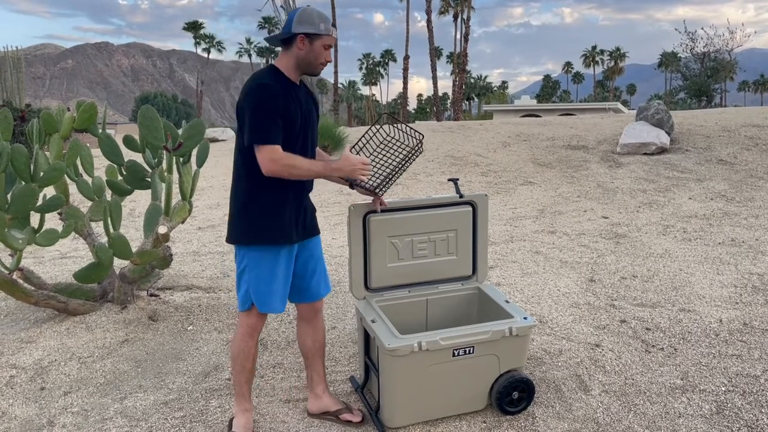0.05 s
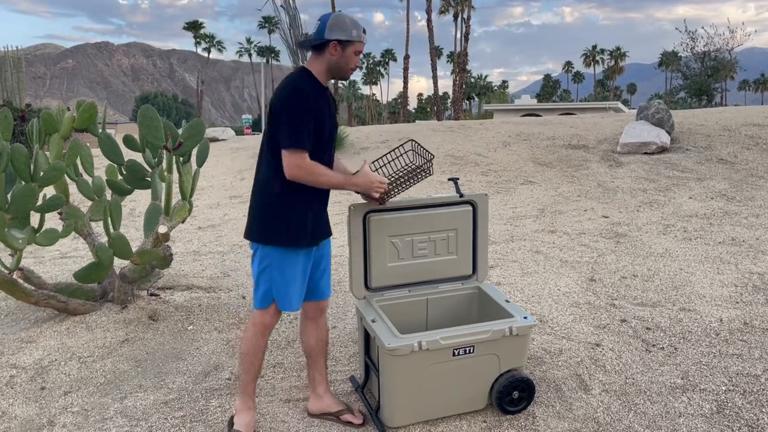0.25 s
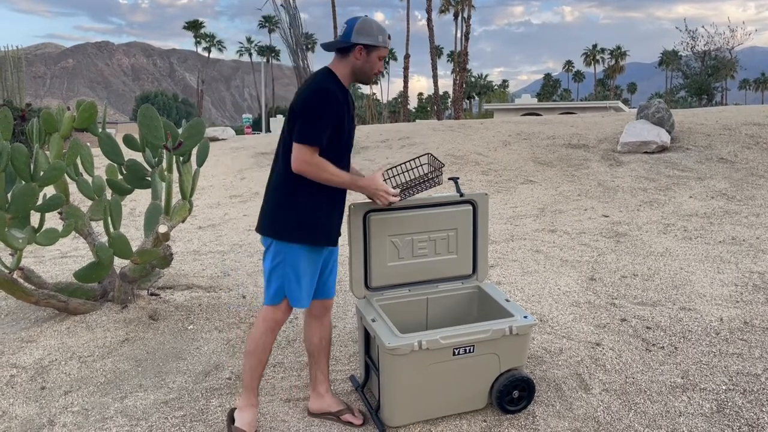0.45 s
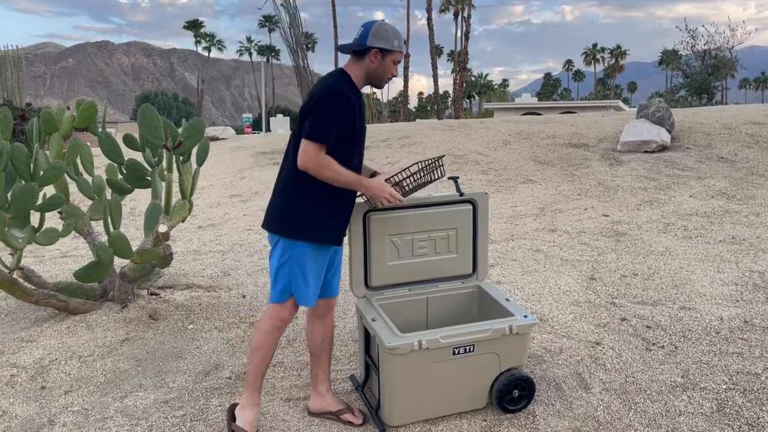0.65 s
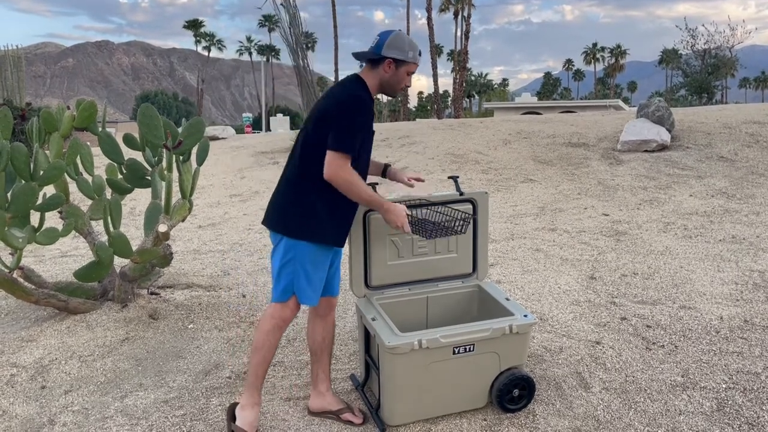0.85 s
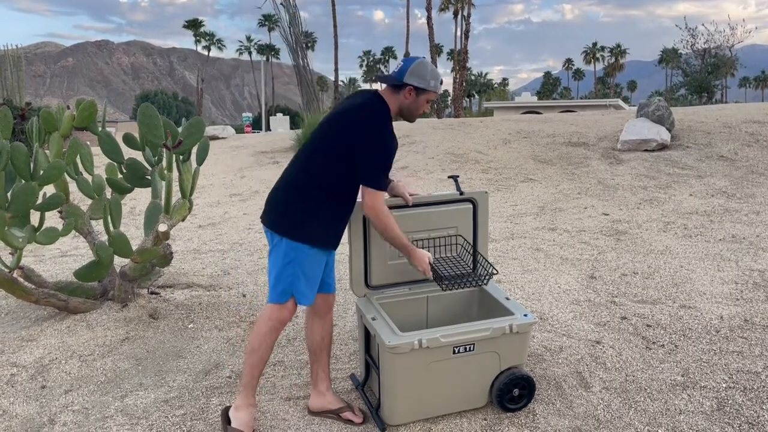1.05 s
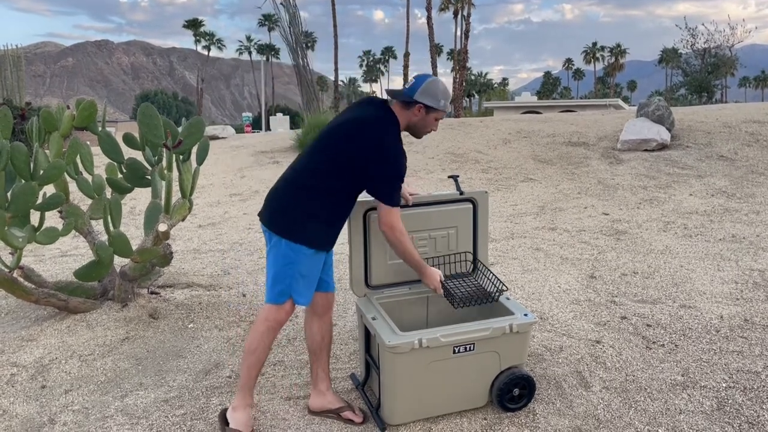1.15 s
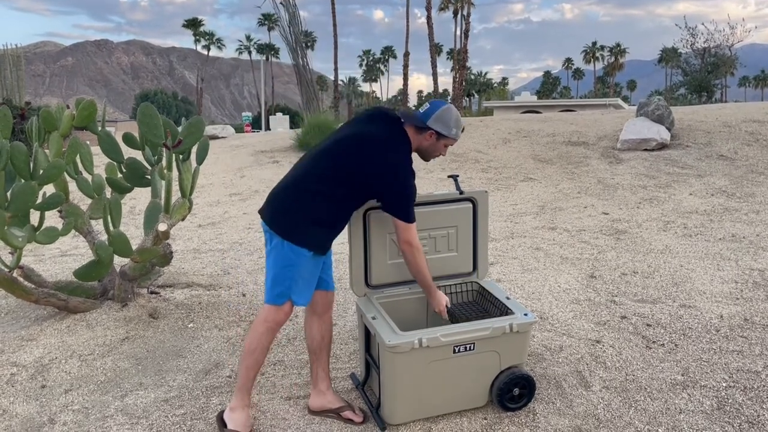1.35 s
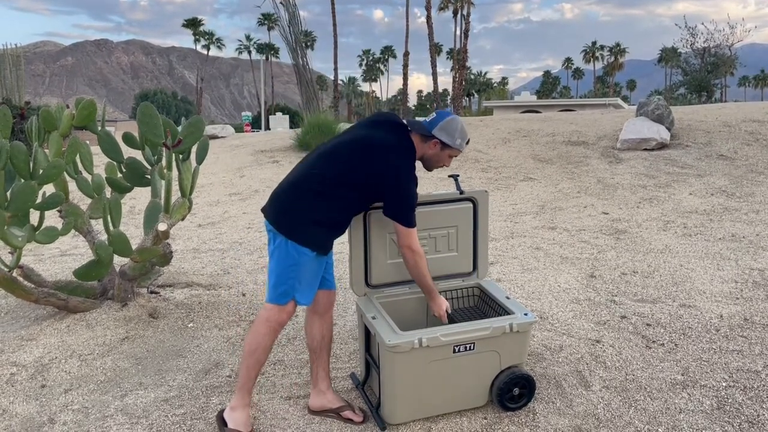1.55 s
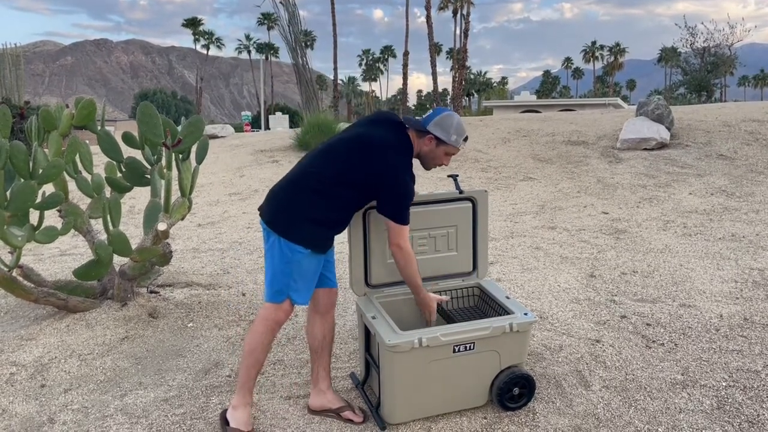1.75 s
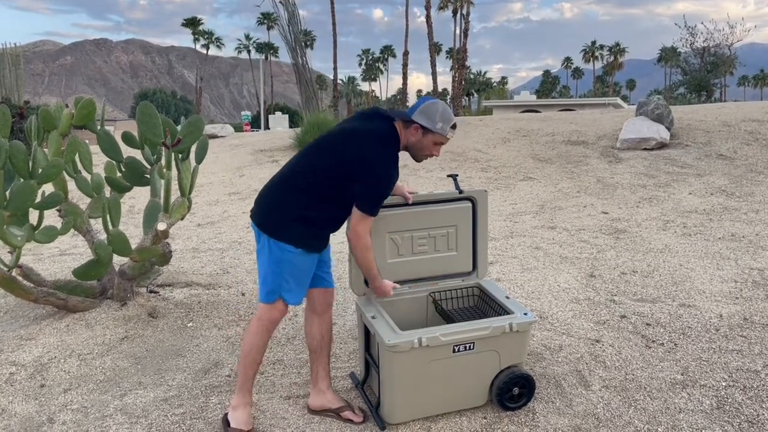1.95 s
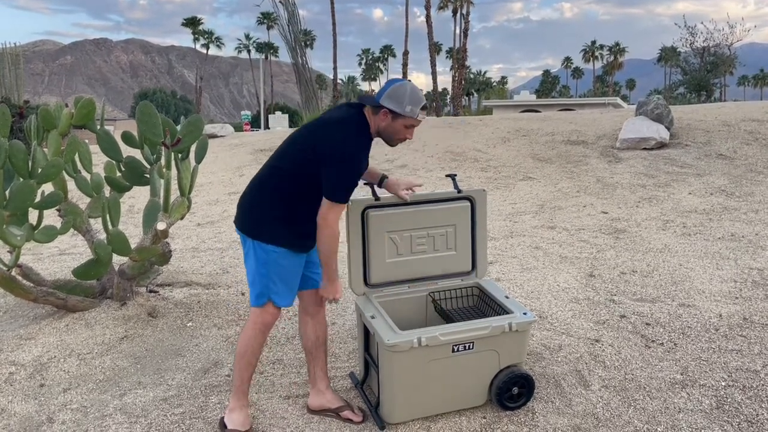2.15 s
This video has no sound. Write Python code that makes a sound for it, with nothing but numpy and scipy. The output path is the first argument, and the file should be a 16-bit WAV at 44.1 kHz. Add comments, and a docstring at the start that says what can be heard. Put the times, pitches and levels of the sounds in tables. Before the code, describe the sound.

Soft footfalls and grit crackle on sandy ground, then a wire basket knocks and scrapes quickly into a hollow plastic cooler, followed by tiny taps; outdoors, miked fairly close, low far-off rumble.

```python
"""You hear a wire basket catch the rim of an open plastic cooler, rattle down and seat in one short clunk.
Each touch makes a click, a dull clack and a short ring of the wires; sliding wires add a run of tiny ticks.
Heavier blows make the hollow cooler thump, with a weak echo. Before and after come light taps of the basket.
Sandals crack grit, scuff sand and make two soft footfalls, over a far rumble and rush like traffic outdoors.
Rings are fading sine waves; clicks, clacks, grit, scuffs and the background are shaped noise."""
import sys
import numpy as np
from scipy import signal
from scipy.fft import rfft, irfft, next_fast_len
from scipy.io import wavfile
from scipy.ndimage import map_coordinates

SR = 44100
rng = np.random.default_rng(int(sys.argv[2]) if len(sys.argv) > 2 else 0)


def master(y):
    """Save y as 16-bit WAV."""
    cut = np.clip(np.atleast_2d(y).T, -1, 1)
    pcm = np.round(cut * 32767)  # scale
    wavfile.write(sys.argv[1], SR, pcm.astype(np.int16))


N = 96623  # length in samples

# All levels in the tables are relative.
# Wire striking plastic. Each row: start in seconds, ring level in dB, click level in dB, favoured ring in Hz.
CONTACTS = [(1.3381, -20, -37, 1210), (1.3643, -20, -35.5, 1950), (1.379, -14.5, -38.5, 1700),
            (1.3826, -9.5, -25, 2760), (1.390, -19.5, -35.5, 1970), (1.4046, -16.5, -33.5, 1380),
            (1.412, -12, -36.5, 1204), (1.425, -15, -33, 1840), (1.449, -19, -33.5, 2200),
            (1.455, -9, -25.5, 1693), (1.4593, -24.5, -16.5, 1950), (1.463, -9.5, -39.5, 1210),
            (1.4868, -18.5, -24.5, 1865), (1.492, -11, -28, 1300), (1.498, -17, -20.5, 2400),
            (1.504, -13, -34.5, 1430), (1.519, -12.5, -21.5, 1800), (1.522, -13.5, -33, 1200),
            (1.53, -44.5, -54, 1520), (1.538, -23, -54, 1210)]
# Light taps of the basket in the hand and as it is let go. Each row: the same columns as CONTACTS.
TAPS = [(0.1253, -33, -62, 1770), (0.1289, -37, -56, 1820), (0.146, -36.5, -58, 1840),
        (0.9975, -36.5, -58.5, 2110), (1.7355, -42, -69, 2110), (1.738, -35.5, -78, 1380),
        (1.752, -40, -74, 1450), (1.762, -37.5, -73.5, 1060)]
CONTACT_OCTAVES, TAP_OCTAVES = 0.6, 0.24  # spread of a touch over the basket's tones
# The basket's own tones (modes). Each row: pitch in Hz, level in dB, time to fall 60 dB in seconds.
BASKET_MODES = [(1055, -2, .11), (1130, -3, .1), (1193, -2, .1), (1232, -1, .1), (1344, -2, .12),
                (1523, 0, .09), (1609, 1, .11), (1661, 0, .09), (1760, -1, .09), (1960, -7, .08),
                (2024, -7, .08), (2471, -4, .09), (2597, 0, .115), (2719, -2, .1), (2835, -3, .08)]
# The short wires' high tones. Each row: pitch in Hz, level in dB, time to fall 60 dB in seconds.
TINK_MODES = [(3774, -1, .05), (4050, -4, .045), (4646, 0, .06), (5120, -2, .05), (5313, -4, .05),
              (6002, -4, .05), (6304, -7, .045), (9179, -13, .04), (10271, -12, .04)]
TINK_HZ, TINK_OCTAVES = 5000, 2.5  # favoured pitch and spread
# Tone colour of the dull clack of plastic. Each row: frequency in Hz, level in dB.
CLACK_COLOUR = [(300, -33), (550, -20), (880, -7), (1100, -2), (1250, 5), (1700, -14), (2150, -2),
                (2750, -0.5), (3200, -8), (5000, -10.5), (9000, -56)]
# Tone colour of the sharp click. Each row: frequency in Hz, level in dB.
CLICK_COLOUR = [(1000, -28), (2700, 0), (3400, -11), (4700, -9.5), (6200, -9.5), (7700, -20.5),
                (9300, -19.5), (10600, -24), (12500, -30), (15500, -34.5)]
RING_DB, CLACK_DB, TINK_DB = -3, -5.5, -4.5  # added to the row's ring, ring and click level
CLACK_T60_S, CLICK_T60_S, ATTACK_S = 0.079, 0.048, 0.0003
# Stereo width of near sounds. Each row: frequency in Hz, side level in dB against the middle.
NEAR_WIDTH = [(100, -22), (300, -38), (700, -13.5), (1300, -14.5), (2400, -15), (4400, -10), (8000, 0.5),
              (15000, -8)]

# Wires sliding along the wall. Each row: start in seconds, length in seconds, level in dB.
SLIDES = [(1.366, .08, -36), (1.478, 0.046, -34)]
# Tone colour of the slide. Each row: frequency in Hz, level in dB.
SLIDE_COLOUR = [(700, -19), (1100, 1), (1700, 3), (2700, -2), (3400, -3.5), (5000, -9), (6800, -15.5),
                (8000, -31.5), (9500, -27.5), (13000, -39.5), (15000, -54.5)]
SLIPS_PER_S, SLIP_SCATTER_DB, SLIDE_EDGE_S = 1000, 6, 0.006

# Blows that reach the cooler's hollow body. Each row: start in seconds, level in dB, favoured pitch in Hz.
THUMPS = [(1.3461, -12, 270), (1.353, -13.5, 412), (1.357, -13.5, 170), (1.360, -21, 322),
          (1.387, -16.5, 152), (1.428, -16.5, 400), (1.459, -11, 688), (1.459, -21.5, 317.5),
          (1.473, -9.5, 240), (1.500, -16, 185), (1.500, -17.5, 691), (1.519, -17, 491), (1.525, -11, 252),
          (1.527, -22, 916), (1.741, -33, 330)]
# The cooler's own tones. Each row: pitch in Hz, level in dB, time to fall 60 dB in seconds.
COOLER_MODES = [(168, 0, .21), (186, -4, .12), (233, 0, .15), (253, 0, .2), (293, -1, .12), (392, -5, .13),
                (426, -4, .12), (520, -10, .06), (572, -7, .12), (609, -7, .11), (631, -7, .12),
                (711, -7, .08), (790, -7, .08), (861, -3, .1)]
THUMP_OCTAVES, THUMP_ATTACK_S, COOLER_LOW_HZ = 0.26, 0.003, 125  # spread, rise time, low cut
THUD_DB, THUD_T60_S = -10.5, 0.08  # the walls' many small, quickly damped tones

# Echo of the cooler's cavity and the yard. Each row: frequency in Hz, time to fall 60 dB in seconds.
ECHO_T60 = [(200, 0.39), (1500, 0.29), (5000, 0.23), (12000, 0.15)]
ECHO_DB = -20.5
# Phase offset between the sides of the clunk. Each row: frequency in Hz, left lag behind right in radians.
LEFT_LAG = [(2000, 0), (3600, -.6), (5400, .1), (6300, 1.5), (7400, 3.4), (10200, 6), (12500, 8),
            (15000, 9.6)]

# Grit cracking under the sandals. Each row: start in seconds, level in dB, pitch in Hz.
GRIT = [(0.336, -45, 4400), (0.5664, -47, 3000), (0.582, -50, 3510), (0.623, -41.5, 2700),
        (0.655, -62.5, 9000), (0.9305, -47, 2380)]
GRIT_T60_S, GRIT_OCTAVES = 0.015, 0.39
# Soft scuffs on sand. Each row: middle in seconds, width in seconds, level in dB, pitch in Hz, spread in octaves.
SCUFFS = [(0.15, 0.21, -60, 3530, 0.39), (0.36, 0.018, -63, 5000, 0.16), (0.58, 0.089, -61, 3060, 0.33),
          (1.03, 0.076, -64, 3370, 0.41), (1.95, 0.021, -64.5, 4760, 0.16)]
# Soft footfalls. Each row: start in seconds, level in dB, pitch in Hz.
STEPS = [(0.085, -28, 106.7), (1.02, -26.5, 112)]
FOOT_T60_S, FOOT_ATTACK_S = 0.18, 0.012

# Tone colour of the far rumble. Each row: frequency in Hz, level in dB.
RUMBLE_COLOUR = [(25, -58), (50, -27), (65, -23), (85, -5.5), (120, -4.5), (160, -5), (220, 1), (280, -7),
                 (350, -11), (600, -17.5), (900, -17.5), (1500, -83.5)]
# Loudness of the rumble over time. Each row: time in seconds, level in dB.
RUMBLE_LEVEL = [(0, -38.5), (.4, -37.5), (.7, -38.5), (1.1, -40.5), (1.35, -38), (1.701, -42),
                (2.19, -44.5)]
# Tone colour of the thin rush. Each row: frequency in Hz, level in dB.
RUSH_COLOUR = [(300, -13.5), (500, -3), (790, 2), (1000, 5), (1600, -3), (2000, -4), (2500, -9.5),
               (3200, -14.5), (4000, -29.5), (5000, -27.5), (6300, -38.5), (8000, -54), (10000, -37.5),
               (13000, -50.5), (15500, -62)]
# Loudness of the rush over time. Each row: time in seconds, level in dB.
RUSH_LEVEL = [(0, -44.5), (.6, -47), (1.0, -45.5), (1.3, -47), (1.8, -49), (2.19, -48.5)]
# Stereo width of the background and scuffs. Each row: frequency in Hz, side level in dB against the middle.
FAR_WIDTH = [(60, -21), (250, -5), (1000, -9), (4000, -7), (10000, -4)]
FAR_LEAD_S, FAR_TILT_DB = 0.00045, 0.7  # left leads right; left is raised and right lowered by the tilt
RUMBLE_SWAY_DB, RUMBLE_SWAYS_PER_S = 1, 14.02
TOP_HZ = 15830  # upper band limit


def basket():
    """Each touch gives a sharp click, a dull clack of plastic and a short ring of the wires."""
    out, t = np.zeros((2, N)), np.arange(SR // 4) / SR
    for rows, octaves in [(CONTACTS, CONTACT_OCTAVES), (TAPS, TAP_OCTAVES)]:
        for s, ring_db, click_db, hz in rows:
            wires = ring(BASKET_MODES, hz, octaves, ATTACK_S, t, scatter_db=1, scatter_turns=0.4)
            clack = noise(lambda f: amp(along(CLACK_COLOUR, f)) * bell(f, hz, octaves), NEAR_WIDTH, len(t))
            clack = clack * fade(t, CLACK_T60_S, ATTACK_S)
            click = noise(lambda f: amp(along(CLICK_COLOUR, f)), NEAR_WIDTH, len(t))
            click = click * fade(t, CLICK_T60_S, ATTACK_S)
            tink = ring(TINK_MODES, TINK_HZ, TINK_OCTAVES, ATTACK_S, t, scatter_db=-0.5, scatter_turns=0.33)
            add(out, s, amp(ring_db) * (amp(RING_DB) * wires + amp(CLACK_DB) * clack))
            add(out, s, amp(click_db) * (click + amp(TINK_DB) * tink))
    return out * amp([[-0.5], [0.5]])  # slightly to the right


def slide():
    """The wires stick and slip down the plastic in a dense run of tiny ticks."""
    out, clock = np.zeros((2, N)), np.arange(N) / SR
    for s, length, db in SLIDES:
        happens = rng.random(N) < SLIPS_PER_S / SR
        strength = amp(SLIP_SCATTER_DB * rng.standard_normal(N))
        slips = happens * strength * rng.choice([-1, 1], N)
        pressure = np.clip(np.minimum(clock - s, s + length - clock) / SLIDE_EDGE_S, 0, 1)
        ticks = unit(filtered(slips, lambda f: amp(along(SLIDE_COLOUR, f))))
        out += amp(db) * pressure * ticks
    return out


def cooler():
    """The thick hollow walls answer the heavier blows with a low thump; they radiate little deep bass."""
    out, t = np.zeros((2, N)), np.arange(SR // 3) / SR
    for s, db, hz in THUMPS:
        boom = ring(COOLER_MODES, hz, THUMP_OCTAVES, THUMP_ATTACK_S, t, scatter_db=4.5, scatter_turns=0.072)
        thud = noise(lambda f: bell(f, hz, THUMP_OCTAVES), NEAR_WIDTH, len(t))
        thud = thud * fade(t, THUD_T60_S, THUMP_ATTACK_S)
        add(out, s, amp(db) * (boom + amp(THUD_DB) * thud))
    low_cut = signal.butter(4, COOLER_LOW_HZ, "high", fs=SR, output="sos")
    return signal.sosfilt(low_cut, out)


def echo(x):
    """A short tail of noise in which each frequency dies at its own speed."""
    hz, t, z = signal.stft(rng.standard_normal((2, SR // 2)), SR, nperseg=256)
    dying = z * amp(-60 * t / along(ECHO_T60, hz)[:, None])
    tail = signal.istft(dying, SR, nperseg=256)[1]
    return signal.fftconvolve(x, tail / np.linalg.norm(tail[0]), axes=1)[:, :N]


def sandals():
    """Grains crack and sand hisses as the feet shift; each soft footfall is a low, fading sine wave."""
    out, t, clock = np.zeros((2, N)), np.arange(SR // 5) / SR, np.arange(N) / SR
    for s, db, hz in GRIT:
        crack = noise(lambda f: bell(f, hz, GRIT_OCTAVES), NEAR_WIDTH, len(t))
        add(out, s, amp(db) * crack * fade(t, GRIT_T60_S, ATTACK_S))
    for s, width, db, hz, octaves in SCUFFS:
        swell = np.exp(-0.5 * ((clock - s) / width) ** 2)
        out += amp(db) * swell * noise(lambda f: bell(f, hz, octaves), FAR_WIDTH, N)
    for s, db, hz in STEPS:
        add(out, s, amp(db) * np.sin(2 * np.pi * hz * t) * fade(t, FOOT_T60_S, FOOT_ATTACK_S))
    return out


def far_traffic():
    """A low, wavering rumble and a thin rush arrive from the left, so the left side is earlier and louder."""
    clock = np.arange(N) / SR
    rumble = noise(lambda f: amp(along(RUMBLE_COLOUR, f)), FAR_WIDTH, N)
    rumble = rumble * amp(np.interp(clock, *np.transpose(RUMBLE_LEVEL)))
    rush = noise(lambda f: amp(along(RUSH_COLOUR, f)), FAR_WIDTH, N)
    rush = rush * amp(np.interp(clock, *np.transpose(RUSH_LEVEL)))
    # a smooth curve through random points
    sway = map_coordinates(rng.standard_normal(size=200), [clock * RUMBLE_SWAYS_PER_S], mode="wrap")
    both = amp(RUMBLE_SWAY_DB * sway) * rumble + rush
    sides = np.array([[1], [-1]])  # left, right
    shifted = filtered(both, lambda f: np.exp(1j * np.pi * f * FAR_LEAD_S * sides))
    return amp(FAR_TILT_DB * sides) * shifted


def ring(modes, favoured_hz, octaves, attack, t, scatter_db, scatter_turns):
    """Fading sine waves in stereo; the point of contact favours those near one pitch."""
    hz, db, t60 = np.transpose(modes)
    size, turn, lean = rng.standard_normal((3, len(hz)))
    gain = amp(db + scatter_db * size) * (bell(hz, favoured_hz, octaves) + 0.083)
    gain = gain * np.sqrt(2) / np.linalg.norm(gain)
    phase = 2 * np.pi * (hz[:, None] * t + scatter_turns * turn[:, None])
    decay = fade(t, t60[:, None], attack)
    mid = gain @ (decay * np.sin(phase))
    side = (gain * lean * amp(along(NEAR_WIDTH, hz))) @ (decay * np.cos(phase))
    return np.array([mid + side, mid - side])


def noise(colour, width, size):
    """Stereo noise of average (rms) level 1 with a given colour and side level."""
    def shape(hz):
        side = amp(along(width, hz))
        return colour(hz) * np.array([np.ones_like(hz), side]) / np.hypot(1, side)
    mid, side = filtered(rng.standard_normal((2, size)), shape)
    return unit(np.array([mid + side, mid - side]))


def fade(t, t60, attack):
    """A quick rise and an exponential decay that falls 60 dB in t60 seconds."""
    return amp(-60 * t / t60) * (1 - np.exp(-t / attack))


def filtered(x, response):
    """Change the strength or phase of each frequency in x."""
    n = x.shape[-1]
    m = next_fast_len(n + 8192)  # spare room for the filter's tail
    return irfft(rfft(x, m) * response(np.fft.rfftfreq(m, 1 / SR)), m)[..., :n]


def bell(hz, centre_hz, octaves):
    """A bell-shaped gain on a log frequency axis."""
    return np.exp(-0.5 * (np.log2((hz + 1) / centre_hz) / octaves) ** 2)


def along(points, hz):
    """Read a value between (Hz, value) points on a log frequency axis."""
    f, v = np.transpose(points)
    return np.interp(np.log(hz + 1), np.log(f + 1), v)


def amp(db):
    """Turn decibels into a plain multiplier."""
    return 10 ** (np.asarray(db) / 20)


def unit(x):
    """Scale to an average (rms) level of 1."""
    return x / np.sqrt(np.mean(x ** 2) + 1e-20)


def add(out, s, sound):
    """Mix a sound in at s seconds."""
    part = out[:, round(s * SR):][:, :sound.shape[-1]]
    part += sound[..., :part.shape[1]]


def scene():
    """The clunk, with a phase offset between its sides, then its echo, the feet and the background."""
    sides = np.array([[-0.5], [0.5]])  # half the offset on each side
    clunk = filtered(basket() + slide() + cooler(), lambda f: np.exp(1j * along(LEFT_LAG, f) * sides))
    return clunk + amp(ECHO_DB) * echo(clunk) + sandals() + far_traffic()


def record(dry):
    """Peaks are rounded towards full scale; nothing is kept above the band limit."""
    rounded = dry / (1 + np.abs(dry) ** 6) ** (1 / 6)
    return filtered(rounded, lambda hz: hz < TOP_HZ)


dry = scene()
out = record(dry)
master(out)
```